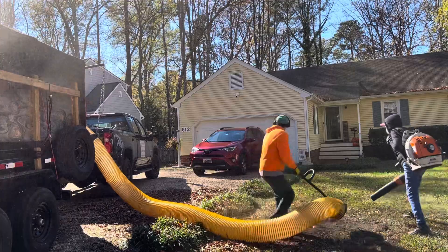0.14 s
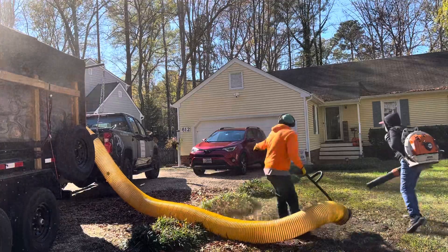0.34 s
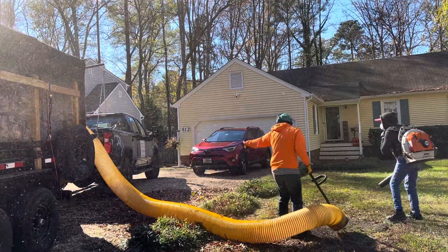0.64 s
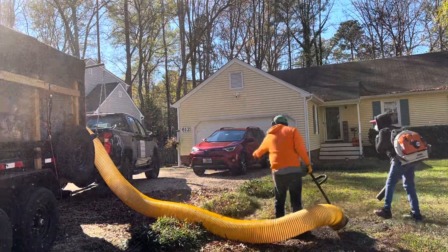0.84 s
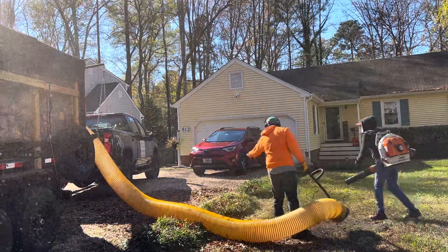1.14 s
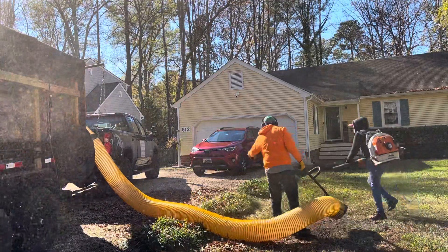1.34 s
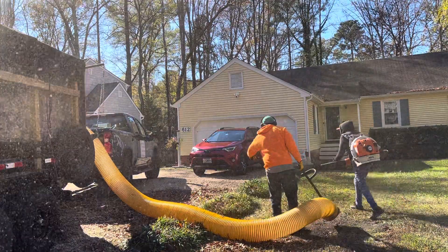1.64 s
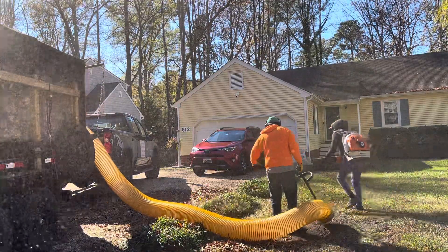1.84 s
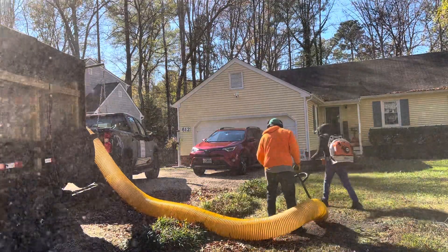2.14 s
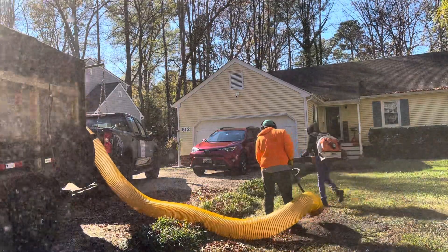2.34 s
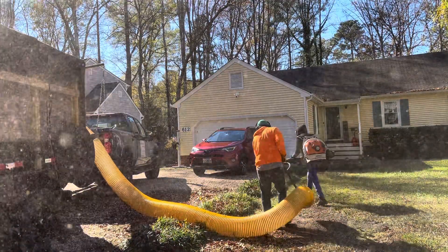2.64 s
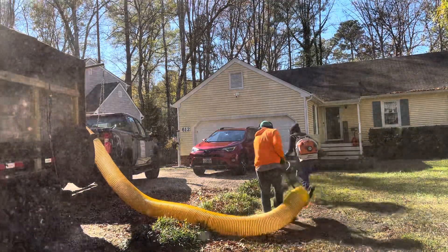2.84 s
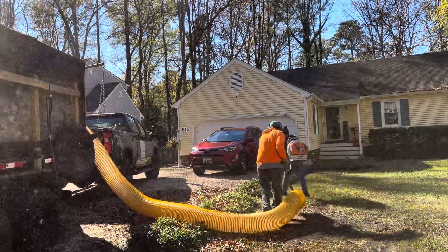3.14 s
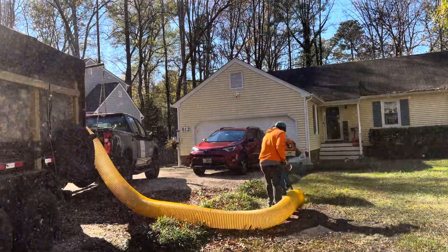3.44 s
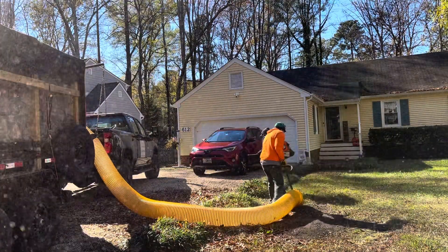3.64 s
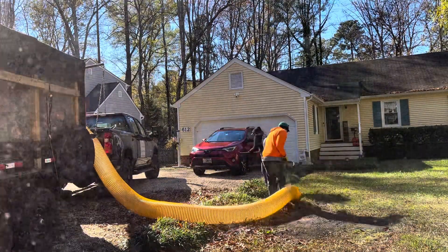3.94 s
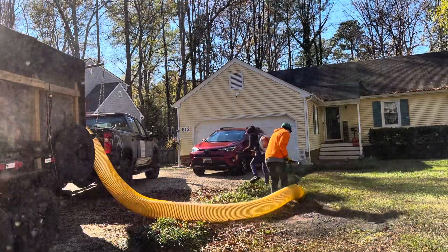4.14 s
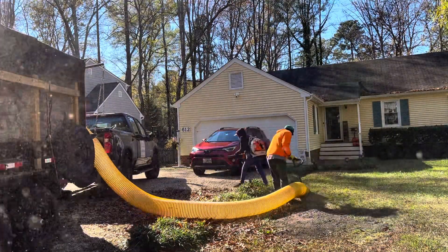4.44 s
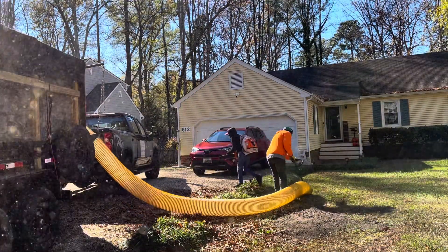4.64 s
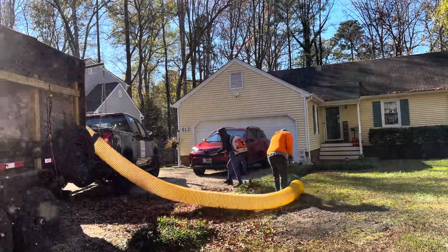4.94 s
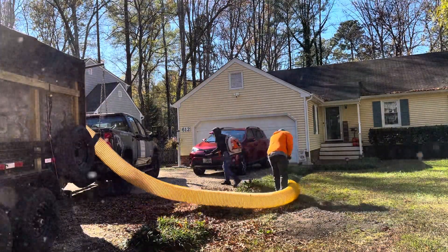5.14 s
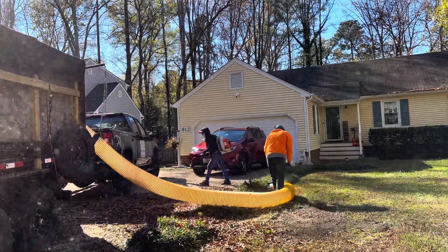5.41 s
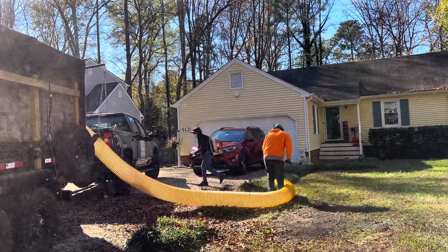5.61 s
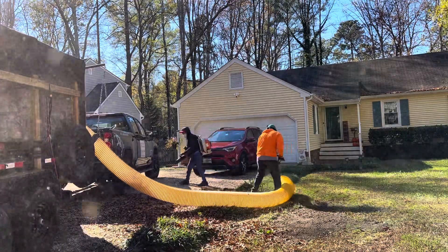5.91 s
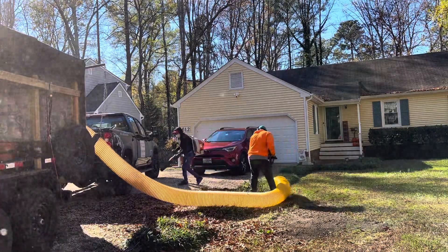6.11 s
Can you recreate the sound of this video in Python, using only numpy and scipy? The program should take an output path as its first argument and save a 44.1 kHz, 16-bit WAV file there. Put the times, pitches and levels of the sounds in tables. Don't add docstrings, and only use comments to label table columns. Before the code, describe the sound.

Fast engine drone and rushing suction with crackling dry leaves, plus a small gas blower revving, whining, popping down to idle and cutting out midway.

```python
import sys
import numpy as np
from scipy import signal
from scipy.fft import rfft, irfft, next_fast_len
from scipy.io import wavfile
from scipy.ndimage import uniform_filter1d

SR = 44100
rng = np.random.default_rng(int(sys.argv[2]) if len(sys.argv) > 2 else 0)


def gain_from_decibels(decibels):
    exponent = np.asarray(decibels, float) / 20
    return 10 ** exponent


def dump_mix(stems):
    frames = np.atleast_2d(stems).T
    limited = np.clip(frames, -1, 1)
    pcm = np.round(limited * 32767).astype(np.int16)
    wavfile.write(sys.argv[1], SR, pcm)


N = 276494

TIME = np.arange(N) / SR
SIZE = next_fast_len(N + 4096)
HZ = np.maximum(np.fft.rfftfreq(SIZE, 1 / SR), 1)

# pitch_hz, left_minus_right_db, left_lead_rad, likeness (0-1)
VACUUM_TO_PORTS = [(60, -1.5, 0.37, 1), (130, 0, 0.31, 1), (245, 2, 0.82, 0.99), (660, 9.5, 0.96, 0.33),
                   (1400, 3.5, 0.15, 0.71), (2360, 5.5, 0.89, 0.59), (4300, 4, 0.21, 0.2),
                   (6100, 14, 0.36, 0.8), (7100, 0, 0.25, 0)]
# pitch_hz, left_minus_right_db, left_lead_rad, likeness (0-1)
BLOWER_TO_PORTS = [(100, 0.5, 6.5, 0.94), (530, 0, -2.5, 0.95), (1620, -4.5, -1.8, 0.87),
                   (2440, 8.5, 0.5, 0.6), (3130, 6.5, -2, 0.55), (3840, 10.5, -4.5, 1), (4630, 4.5, -8, .3),
                   (5220, 15, 0.5, 0.86), (6000, 4, -9.5, 0.5)]


def rms_one(x):
    return x / np.sqrt(np.mean(x ** 2) + 1e-20)


def in_time(rows):
    s, *columns = np.transpose(rows)
    return [np.interp(TIME, s, column) for column in columns]


def at_hz(points, hz):
    point_hz, point_db = np.array(points)[:, :2].T
    return np.interp(np.log(hz), np.log(point_hz), point_db)


def drift(rate):
    r = np.exp(-80 * np.pi * rate / SR)
    noise = rng.standard_normal(N // 40 + 2002)
    slow = signal.lfilter([1], [1, -2 * r, r * r], noise)[2000:]
    return np.interp(np.arange(N) / 40, np.arange(len(slow)), rms_one(slow))


def swells(rows):
    s, half_s, *heights = np.transpose(rows)
    coarse = TIME[::64]
    hump = np.cos(np.pi / 2 * np.clip((coarse[:, None] - s) / half_s, -1, 1)) ** 2
    return [np.interp(TIME, coarse, hump @ height) for height in heights]


def resonate(x, modes):
    out = 0
    for k, (hz, width, level_db) in enumerate(modes):
        r = np.exp(-np.pi * width / SR)
        poles = [1, -2 * r * np.cos(2 * np.pi * hz / SR), r * r]
        bell = signal.lfilter([1, 0, -1], poles, x + 1e-18)
        out = out + (-1) ** k * gain_from_decibels(level_db) * (1 - r * r) / 2 * bell
    return out


def ports(source, spread, path, spectrum=((1, 0), (2, 0))):
    # pitch_hz, left_minus_right_db, left_lead_rad, likeness (0-1)
    treble = [(6500, 1, 1, 0.94), (7600, 0.22, 0.54, 1), (8000, .5, 1, 0.57), (8630, 0.083, -1.25, 0.92),
              (9360, 0.098, -3, 0.96), (10640, 0.044, -3, 1), (10950, 0, -3.5, 0.81),
              (12300, 0.058, -5.5, 0.69), (12800, 0.092, -6, .98), (14400, 0.17, -5, 0.92),
              (14950, 0.1, -7, 0.9), (15250, 0, -9, .9), (15600, 0.12, -9.5, .9)]
    laps = 2 * np.pi * np.round(path[-1][2] / (2 * np.pi))
    rows = list(path) + [(f, d, p + laps, c) for f, d, p, c in treble]
    hz, side_db, lead, alike = np.transpose(rows)
    alike = np.clip(np.interp(HZ, hz, alike), 0, 1)
    shared = np.sqrt(1 + alike) * rfft(source, SIZE)
    opposed = np.sqrt(1 - alike) * rfft(spread, SIZE) * [[1], [-1]]
    step = gain_from_decibels(np.interp(HZ, hz, side_db) / 2) * np.exp(.5j * np.interp(HZ, hz, lead))
    return (shared + opposed) * gain_from_decibels(at_hz(spectrum, HZ)) * np.array([step, 1 / step])


def turbulence(white, spectrum, path, patchy_db, low_hz, high_hz):
    pair = ports(*white, path, spectrum)
    inside = (HZ > low_hz) & (HZ < high_hz)
    pair /= np.sqrt(2 * np.sum(np.abs(pair.mean(0)[inside]) ** 2) / SIZE / N)
    lowest_hz = spectrum[0][0]
    band = np.clip(2 * np.log(HZ / lowest_hz) / np.log(13000 / lowest_hz), 0, 2)
    together = drift(15)
    out = 0
    for k in range(3):
        share = np.cos(np.pi / 2 * np.clip(band - k, -1, 1)) ** 2
        flicker = gain_from_decibels(patchy_db * (0.86 * together + 0.74 * drift(32.0)))
        out = out + irfft(pair * share, SIZE)[:, :N] * flicker
    return out


def tone(phase, level_db, side_db, lead):
    step = gain_from_decibels(side_db / 2)
    both = np.sqrt(np.maximum(step ** 2 + step ** -2.0 + 2 * np.cos(lead), .8))
    pair = np.array([step * np.sin(phase + lead / 2), np.sin(phase - lead / 2) / step])
    return np.sqrt(8) * gain_from_decibels(level_db) / both * pair


def roar(blade, cycle):
    # pitch_hz, level_db (per Hz)
    air_colour = [(30, -29), (45, -10), (70, -2), (130, -3), (260, -4.5), (520, -8), (650, -11.5),
                  (1000, -15), (1380, -16), (1540, -25.5), (2800, -29.5), (4500, -39), (7500, -42),
                  (15500, -52.5)]
    # time_s, level_db
    air_level = [(0, -46), (.96, -45), (1.15, -47), (3.0, -48.5), (3.7, -49.5), (4.2, -48), (6.27, -47.5)]
    chop = 1 + 0.13 * np.cos(blade) + 0.15 * np.cos(2 * cycle) + 0.044 * np.cos(3 * cycle + 1)
    white = chop * rng.standard_normal((2, N))
    air = turbulence(white, air_colour, VACUUM_TO_PORTS, patchy_db=0.66, low_hz=764.4, high_hz=874.0)
    return gain_from_decibels(in_time(air_level)[0]) * air


def leaves():
    # pitch_hz, level_db (per Hz)
    rustle_colour = [(1100, -30), (1800, 3), (2200, -6.5), (3500, -6.5), (4300, -3), (5200, -8.5),
                     (6200, -8.5), (7000, -9), (8500, -11), (10000, -8.5), (12000, -15.5), (15500, -17.5)]
    # time_s, level_db
    feed = [(1.0, -57.5), (1.55, -57), (3.3, -57.5), (3.65, -50), (4.2, -48.5), (5.5, -51), (6.27, -52)]
    # centre_s, half_length_s, above_feed_db
    clumps = [(1.12, 0.098, 8.5), (1.44, .06, 7), (2.14, 0.16, 4), (2.38, 0.24, 4), (3.6, .06, -3),
              (4.13, .08, -0.5), (5.18, 0.044, 0.5), (5.46, 0.049, 5.5), (5.66, 0.033, -0.5),
              (5.89, 0.1, 2), (6.07, 0.027, 3), (6.19, 0.17, 4.5)]
    sizes = gain_from_decibels(1.0 * np.minimum(rng.exponential(1, (2, N)), 5))
    crackle = sizes * rng.standard_normal((2, N))
    arriving = np.clip(TIME / 2.27, 0, 1) ** 3
    level = gain_from_decibels(in_time(feed)[0] + swells(clumps)[0] - 3.0) * arriving
    return level * turbulence(crackle, rustle_colour, VACUUM_TO_PORTS, patchy_db=1.0, low_hz=4200, high_hz=8600)


def twigs():
    # time_s, peak_db
    knocks = [
        (.928, -30.5),
        (.974, -31.5),
        (1.011, -20),
        (1.18, -30.5),
        (1.398, -30),
    ]
    # pitch_hz, width_hz, level_db
    hose_wall = [(600, 250, -0.5), (1000, 400, 0), (1900, 640, -12)]
    s, peak_db = np.transpose(knocks)
    clicks = np.zeros(N)
    clicks[(s * SR).astype(int)] = 15 * gain_from_decibels(peak_db)
    knock = resonate(clicks, hose_wall)
    return irfft(ports(knock, np.roll(knock, 60), VACUUM_TO_PORTS), SIZE)[:, :N]


def whine():
    # time_s, pitch_hz, level_db
    surges = [
        [(0, 1239, -38), (.05, 1275, -41), (.135, 1323, -39), (.16, 1283, -39), (.19, 1190, -45),
         (.23, 1124, -47), (.27, 1050, -62)],
        [(.64, 1084, -62), (.71, 1140, -52), (.775, 1185, -42), (.8, 1231, -38), (.84, 1222, -44),
         (.87, 1257, -40), (.9, 1260, -43), (.93, 1160, -43), (.97, 1070, -61)],
        [(1.48, 1050, -61), (1.505, 1101, -49), (1.53, 1160, -47), (1.555, 1200, -46), (1.58, 1230, -43),
         (1.615, 1213, -51), (1.64, 1120, -46), (1.67, 1016, -62)],
        [(1.65, 1160, -62), (1.68, 1264, -44), (1.71, 1200, -62)],
        [(.67, 775, -57), (.71, 786, -40), (.745, 774, -44), (.8, 796, -46), (.83, 813, -42), (.87, 806, -60)],
        [(1.0, 790, -60), (1.04, 837, -33), (1.075, 830, -60)],
    ]
    out = 0
    for surge in surges:
        hz, level_db = in_time(surge)
        on = (TIME >= surge[0][0]) * (TIME < surge[-1][0])
        phase = 2 * np.pi * np.cumsum(hz) / SR + 0.35 * drift(30)
        out = out + on * tone(phase, level_db + 1.5 * drift(25), -4.0 + 0 * TIME, -0.79)
    return out


def blower_levels(per_s):
    # start_s, end_s
    squeezes = [
        (-.01, .165),
        (.66, 0.894),
    ]
    full_per_s, trigger_s, coast_s = 55, .04, 0.27
    walk_db_per_s, stop_s, stop_db_per_s = 2, 3.57, 90
    held = [(TIME > start) * (TIME < end) * 1. for start, end in squeezes]
    building = sum(h * (TIME - start) / (end - start) for h, (start, end) in zip(held, squeezes))
    pulled, building = uniform_filter1d([sum(held), building], size=int(trigger_s * SR))
    keep = np.exp(-1 / (coast_s * SR))
    coasting = signal.lfilter([1 - keep], [1, -keep], pulled, zi=[.5])[0]
    speed_db = 20 * np.log10(per_s / full_per_s)
    stop_db = stop_db_per_s * np.maximum(TIME - stop_s, 0)
    away_db = walk_db_per_s * TIME + stop_db
    jet_db = -42 + 1.72 * speed_db + 6.3 * coasting - away_db
    exhaust_db = -40 + 1.2 * speed_db + 14 * building - away_db
    rattle_db = -54.5 + 2.7 * speed_db + 2 * pulled - away_db
    idle_db = -54 - 2.5 * np.maximum(2.6 - TIME, 0) - stop_db
    hiss_db = 1 * pulled - 1.5 * coasting
    return jet_db, exhaust_db, rattle_db, idle_db, hiss_db


def exhaust(fired, per_s, level_db):
    # pitch_hz, width_hz, level_db
    muffler = [(110, 60, -2), (385, 70, 1), (445, 60, 3.5), (545, 70, 2), (785, 60, -3), (920, 80, -1)]
    pop = resonate(resonate(fired, muffler), muffler)
    dull = signal.butter(2, 1100, fs=SR, output="sos")
    pop = signal.sosfilt(dull, pop)
    pop = rms_one(pop / np.sqrt(per_s)) * gain_from_decibels(level_db - 0.5)
    return ports(pop, np.roll(pop, 700), BLOWER_TO_PORTS)


def panels(puff, modes, level, path, facing_db):
    scatter_db = 1.8
    shares = [gain_from_decibels(scatter_db * drift(13) + turn_db) for turn_db in facing_db]
    rings = []
    for noise in rng.standard_normal((2, N)):
        ring = sum(share * resonate((puff + 0.1) * noise, [mode]) for share, mode in zip(shares, modes))
        rings.append(level * rms_one(resonate(ring, modes)))
    return ports(*rings, path)


def casing(puff, per_s, rattle_db, idle_db):
    # pitch_hz, width_hz, level_db
    revving_panels = [(1900, 900, 1), (3400, 700, -1), (4150, 300, -3), (5250, 340, 0), (5700, 340, 3),
                      (6900, 550, 1)]
    # pitch_hz, width_hz, level_db
    idling_panels = [(1800, 200, 3.5), (2230, 220, 4), (2650, 250, -1), (3350, 400, 1), (3950, 280, 3),
                     (4350, 260, 1), (5250, 400, -5)]
    # centre_s, half_length_s, level_db
    buzz = [
        (.12, .15, -4),
        (.52, .2, 4),
        (1.05, .12, 2),
    ]
    # centre_s, half_length_s, low_db, middle_db, high_db
    twists = [(2.1, 0.092, -1.5, 3.5, -2), (2.28, 0.15, 5.5, 3, 0.5), (2.37, 0.061, 0, 3, -2),
              (2.53, .07, 0.5, 7.5, -3), (2.63, 0.078, 6, -5, -3.5), (2.69, .035, -3.5, 2, -3.5),
              (2.82, .035, 1.5, -2, 2.5), (2.92, .07, 8, -5, 0), (3.0, 0.053, -6, -2, -4),
              (3.11, 0.11, 5.5, -4, -1), (3.26, 0.036, -0.5, 0.5, -6.5), (3.33, 0.21, -4.5, -4, -1),
              (3.42, .06, -0.5, -2.5, 2), (3.49, .035, -5, 5, -6.5)]
    idling = np.clip((38 - per_s) / 8, 0, 1)
    cover_db = 7.5 - 9 * np.minimum(TIME, 1)
    buzz_db = swells(buzz)[0]
    revving_db = [0, 0, 0, buzz_db, buzz_db, cover_db]
    revving_level = (1 - idling) * gain_from_decibels(rattle_db + 0.5)
    rattle = panels(puff, revving_panels, revving_level, BLOWER_TO_PORTS, revving_db)
    low, middle, high = swells(twists)
    lowest_db = -6.0 * np.maximum(TIME - 2.0, -1)
    idling_db = [lowest_db, low, low, middle, high, high, high]
    chuff = uniform_filter1d(puff, size=170) ** 1.5
    return rattle + panels(chuff, idling_panels, idling * gain_from_decibels(idle_db), VACUUM_TO_PORTS, idling_db)


def air_jet(puff, jet_db, hiss_db):
    # pitch_hz, level_db (per Hz)
    jet_colour = [(250, -22.5), (500, -5.5), (900, -19.5), (1700, -1), (2400, -11), (2950, -21),
                  (3400, -13.5), (4500, -18), (5400, -17.5), (7200, -20), (10000, -19.5), (12000, -26),
                  (15500, -27)]
    # centre_s, half_length_s, hiss_db
    sweeps = [
        (.33, 0.092, 3.5),
        (.46, 0.088, 2),
        (.97, 0.19, -6.5),
        (1.27, .1, -4),
        (1.7, .14, -2),
    ]
    white = (1 + 0.88 * puff) * rng.standard_normal((2, N))
    jet = turbulence(white, jet_colour, BLOWER_TO_PORTS, patchy_db=1.0, low_hz=1470, high_hz=9000)
    jet = gain_from_decibels(jet_db) * jet
    hiss = signal.sosfiltfilt(signal.butter(2, 3020, "high", fs=SR, output="sos"), jet)
    return jet + (gain_from_decibels(hiss_db + swells(sweeps)[0]) - 1) * hiss


def blower():
    # time_s, firings_per_s
    throttle = [(0, 54.33), (.13, 55.6), (.2, 47.73), (.27, 42.1), (.42, 40.03), (.7, 46.74), (.85, 53.27),
                (.93, 52), (1.1, 43.5), (1.3, 35.32), (1.55, 28.9), (1.75, 25.47), (2.1, 23.92),
                (2.7, 23.1), (2.82, 23.5), (2.95, 22.75), (3.2, 22.65), (3.55, 21.95)]
    per_s = in_time(throttle)[0]
    jet_db, exhaust_db, rattle_db, idle_db, hiss_db = blower_levels(per_s)
    firings = np.cumsum(per_s) / SR + .18
    fired = np.diff(np.floor(firings), prepend=0) * gain_from_decibels(.7 * drift(30))
    puff = signal.lfilter([1], [1, -np.exp(-1 / (.009 * SR))], fired)
    puff = uniform_filter1d(puff, size=90)
    body = exhaust(fired, per_s, exhaust_db) + casing(puff, per_s, rattle_db, idle_db)
    return irfft(body, SIZE)[:, :N] + air_jet(puff, jet_db, hiss_db)


def engine(cycle):
    # multiple_of_cycle, level_db
    firing = [(1, -44), (2, -20.5), (3, -17.5), (4, -25), (5, -18.5), (6, -24), (7, -22), (8, 0), (9, -29),
              (10, -21.5), (11, -31.5), (12, -26.5), (13, -25.5), (14, -28), (15, -32), (16, -16),
              (17, -28), (18, -27.5), (19, -28.5), (20, -27.5), (21, -33.5), (22, -38.5)]
    # centre_s, half_length_s, third_db, fifth_db
    load = [(0.048, .12, 4, -2), (0.45, .2, -7, 2), (1.0, 0.16, 4, -15), (1.557, 0.2, -2, 3.5),
            (2.404, .12, 0.5, -4.5), (3.145, 0.36, -3, 3.5), (4.31, 0.12, 1, 3.5), (4.706, 0.4, 2, -1.5),
            (5.092, 0.18, 3, -6.5), (5.703, .12, -4, -9), (5.95, 0.089, -1, 0), (6.155, .2, 0, -1.5)]
    pop_lead, pop_shape = 1.5, 2.57
    loaded = dict(zip((3, 5), swells(load)))
    slow_cycle = cycle[::8]
    hum = 0
    for multiple, level_db in firing:
        k = round(multiple)
        if k % 8 == 0:
            continue
        sway_db = 2.2 * drift(3.1)[::8]
        slip = (0.33 + 0.055 * k) * drift(6.0)[::8]
        if k in loaded:
            sway_db = 0.25 * sway_db + loaded[k][::8]
        phase = k * (slow_cycle + pop_lead) + pop_shape + slip + rng.uniform(-0.32, 0.25)
        hum = hum + gain_from_decibels(level_db + sway_db) * np.sin(phase)
    hum = signal.resample_poly(hum, 8, 1)[:N]
    hum = hum * gain_from_decibels(1.5 * drift(10))
    return gain_from_decibels(-20) * irfft(ports(hum, .5 * np.roll(hum, 9000), VACUUM_TO_PORTS), SIZE)[:, :N]


def impeller(blade):
    # time_s, tone_db, left_minus_right_db, left_lead_rad
    drone = [(.1, -36, 3, 4.3), (.3, -44.5, 5, 3.6), (.5, -34, -2, 1.4), (.86, -31, -3, 1.4),
             (.99, -42, -11, 3.1), (1.13, -31.5, 12, 1.5), (1.31, -29, 10, 0.57), (1.65, -22.5, 6.5, .3),
             (2.05, -21, 6, .37), (2.61, -19, 3, 0.46), (2.95, -20, 0, 0.63), (3.38, -24.5, 2.5, 1.04),
             (3.75, -20, 4.5, 0.68), (4.38, -21.5, 1, .7), (4.9, -22, 3, .84), (5.2, -18.5, 4, 0.75),
             (5.51, -21, 2.5, 0.8), (5.9, -17.5, 4, 0.75)]
    # time_s, lead_rad
    mouth_lead = [
        (.9, 0),
        (1.25, 2),
        (1.75, 2),
        (2.1, 0),
    ]
    # multiple_of_blade_rate, offset_db, left_minus_right_db, left_lead_rad
    overtones = [(2, -0.5, 8.5, 1.03), (3, 0.5, 16.5, 2), (4, 1, 31, -2.5), (5, -1, 10.5, -0.9),
                 (6, -17.5, 7.5, 2)]
    resting_db = [-37, -44.5, -47]
    # centre_s, half_length_s, second_db, third_db
    bites = [(.08, 0.05, 3, 8), (.25, 0.19, -5, -4), (.5, 0.53, 0, 4), (1.05, 0.13, -3, 5.5),
             (1.4, 0.17, 5.5, -4.5), (1.6, 0.19, 8, -3), (1.8, 0.17, 1, -8), (2.05, 0.27, 0.5, -9),
             (2.35, 0.15, 0.5, 8), (2.7, 0.21, -3.5, 1), (2.98, 0.27, 6, 8), (3.33, 0.087, -11.5, 0),
             (3.5, 0.42, 4.5, 3.5), (3.95, 0.25, 2, 3.5), (4.45, 0.097, 5, 1), (4.95, 0.33, 2.5, 5),
             (5.12, 0.065, -6, 0), (5.37, 0.19, 4.5, 0), (5.77, 0.05, 5, 5), (6.1, 0.27, 1, 1.5)]
    # centre_s, half_length_s, fourth_db, fifth_db
    swings = [(.2, 0.22, 2, -6), (.6, 0.11, -2, -4), (1.3, 0.27, -5, -0.5), (2.08, 0.088, 0, 4),
              (2.4, 0.14, -12.5, -3), (2.72, 0.12, -9, -4), (2.88, 0.088, -4, 2.5), (3.0, 0.18, 1.5, -4.5),
              (3.35, 0.14, 4, -5), (3.9, 0.57, -1.5, -1.5), (4.42, 0.13, -4, -5), (4.6, .12, 1.5, -3),
              (4.95, 0.27, -1.5, 2), (5.19, 0.055, 1, -1), (5.4, 0.17, -8, -2), (5.76, 0.071, 2, 2),
              (6.15, 0.11, 4.5, 2)]
    blade_shape = 2.72
    tone_db, side_db, lead = in_time(drone)
    phase = blade + in_time(mouth_lead)[0] + 0.012 * drift(35)
    out = tone(phase, tone_db + .5 * drift(2.0), side_db, lead)
    second, third = swells(bites)
    fourth, fifth = swells(swings)
    top_db = resting_db[2] + 0.36 * second + 0.088 * third
    levels = [resting_db[0] + second, resting_db[1] + third, top_db + fourth, top_db + fifth, top_db]
    for (k, offset_db, side_db, lead), level_db in zip(overtones, levels):
        wobble = 0.22 * drift(3.1) + 0.042 * k * drift(23)
        waver_db = (0.4 + 0.23 * k) * (drift(2.9) + drift(19))
        phase = k * blade + wobble + blade_shape * k
        out += tone(phase, level_db + offset_db + waver_db, side_db + 4.4 * drift(6.8), lead + 0 * TIME)
    return out


def scene():
    blade_hz = 233.6 + 0.264 * drift(1.45)
    blade = 2 * np.pi * np.cumsum(blade_hz) / SR + 3.1
    cycle = blade / 8
    vacuum = roar(blade, cycle) + leaves() + twigs() + engine(cycle) + impeller(blade)
    return vacuum + whine() + blower()


def low_pass(x):
    return signal.sosfilt(signal.butter(12, 15620, fs=SR, output="sos"), x)


def record(dry):
    mix = dry * np.clip((N - np.arange(N)) / 90, 0, 1)
    return low_pass(mix)


dry = scene()
out = record(dry)
dump_mix(out)
```